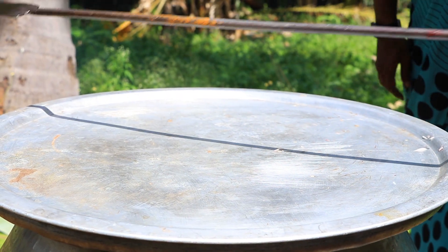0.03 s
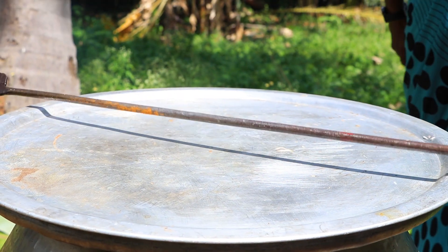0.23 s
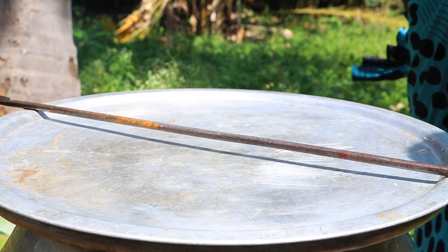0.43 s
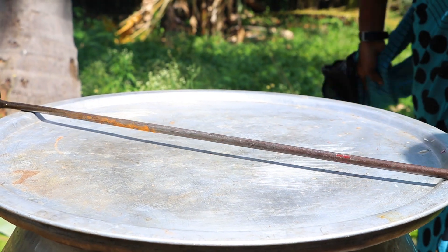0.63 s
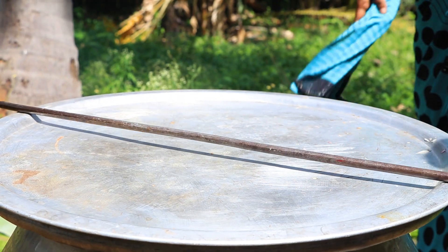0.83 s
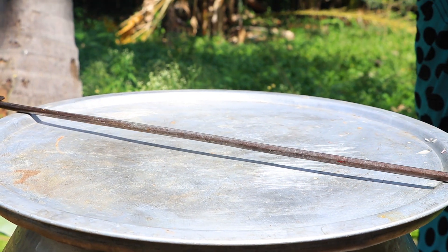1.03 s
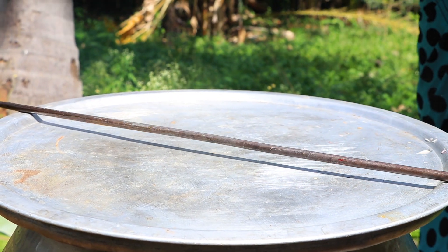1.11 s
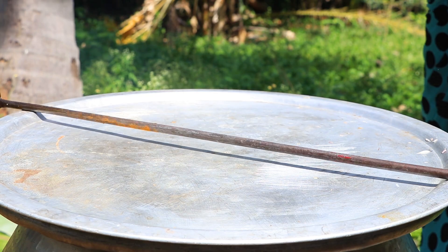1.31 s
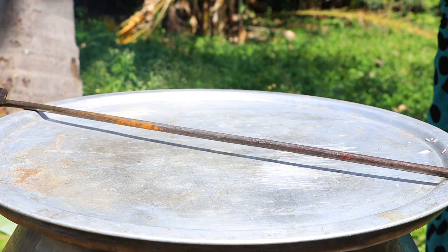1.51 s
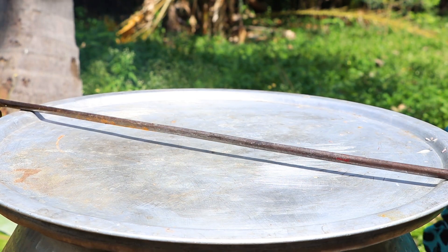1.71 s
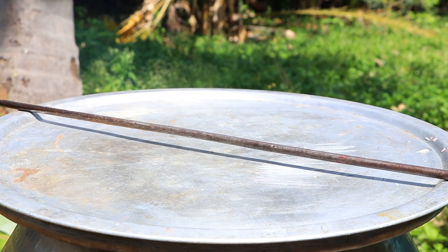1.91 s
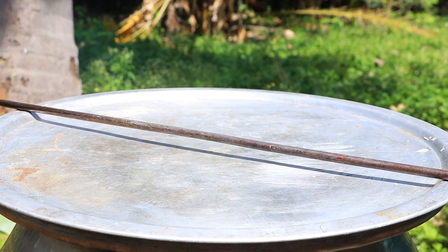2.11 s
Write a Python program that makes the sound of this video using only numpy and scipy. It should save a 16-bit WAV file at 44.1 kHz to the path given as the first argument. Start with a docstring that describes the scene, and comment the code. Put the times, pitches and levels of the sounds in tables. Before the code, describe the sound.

Loud metallic clang of a rod dropped on a large pot lid, rattling and ringing away outdoors.

```python
"""Outdoors in a quiet garden, a long steel rod is dropped across the big metal lid of a cooking pot, close by.
Impulses for the blows and chatter drive noise-built sheet metal, wavering lid modes, a contact crack,
the rod's own ring and the air in the pot. The lid then settles and rings out as clean decaying tones.
Tiny high ticks of the rocking rod, soft noise scuffs and a faint falling whistle sit over garden air
and a low drone. A weak echo follows the crash, and a fast limiter holds it."""
import sys
import numpy as np
from scipy import signal
from scipy.fft import rfft, irfft, next_fast_len
from scipy.io import wavfile
from scipy.ndimage import uniform_filter1d, minimum_filter1d, map_coordinates

SR = 44100
rng = np.random.default_rng(int(sys.argv[2]) if len(sys.argv) > 2 else 0)


def pcm_store(signal):
    """Save signal as 16-bit PCM."""
    levels = np.round(np.clip(np.atleast_2d(signal), -1, 1) * 32767)
    wavfile.write(sys.argv[1], SR, levels.astype(np.int16).T)


N = 94815  # length in samples
TOP_HZ = 15600  # upper edge of the whole sound


def amp(db):
    """Decibels to gain."""
    return 10 ** (np.asarray(db) / 20)


def unit(x):
    """Scale to rms 1."""
    return x / np.sqrt(np.mean(x ** 2) + 1e-20)


def along(points, hz):
    """Read a curve of (f/Hz, value) points on a log frequency axis."""
    f, v = np.transpose(points)
    return np.interp(np.log(hz + 1), np.log(f + 1), v)


def over_time(points, t):
    """Read a curve of (t/s, value) points."""
    return np.interp(t, *np.transpose(points))


def since(s):
    """Seconds since a moment, zero before it."""
    return np.maximum(np.arange(N) / SR - s, 0)


def fade(t, t60):
    """Exponential decay that falls 60 dB in t60 seconds."""
    return np.exp(-np.log(1000) * t / t60)


def sine(hz):
    """A sine that follows a moving pitch."""
    return np.sin(2 * np.pi * np.cumsum(hz) / SR)


def wobble(rate):
    """A smooth random curve, rate knots a second."""
    return map_coordinates(rng.standard_normal(1024), [since(0) * rate], mode="wrap")


def filtered(x, response):
    """Shape the spectrum of x by a response of frequency."""
    m = next_fast_len(N + SR // 2)
    return irfft(rfft(x, m) * response(np.fft.rfftfreq(m, 1 / SR)), m)[..., :N]


def pan(db):
    """Channel gains for a left-minus-right level."""
    return amp(np.array([[.5], [-.5]]) * db)


# Likeness of the two microphones: f/Hz, correlation
ALIKE = [(60, .92), (290, .95), (640, .85), (1400, .75), (3100, .45), (6800, .1), (15000, 0)]


def half_turn(alike, hz):
    """Half the phase angle between channels whose cosine is their likeness."""
    return np.arccos(np.clip(along(alike, hz), -1, 1)) / 2


def noise(colour_db, alike=ALIKE):
    """Stereo noise of rms 1 with a colour and a left-right likeness."""
    def mid_side(hz):
        turn = half_turn(alike, hz)
        return amp(colour_db(hz)) * [np.cos(turn), np.sin(turn)]

    mid, side = filtered(rng.standard_normal((2, N)), mid_side)
    return unit(np.array([mid + side, mid - side]))


def tone(hz, t, drift=0):
    """One mode at the two microphones; high modes arrive out of step. Drift is in cycles."""
    apart = half_turn(ALIKE, hz) * rng.choice([-1, 1])
    start = rng.uniform(0, 2 * np.pi)
    return np.sin(2 * np.pi * (hz * t + drift) + start + np.array([[apart], [-apart]]))


def dying(x, t60s):
    """Let each frequency of x die at its own speed."""
    hz, t, z = signal.stft(x, SR, nperseg=512)
    z = z * fade(t, along(t60s, hz)[:, None])
    return signal.istft(z, SR, nperseg=512)[1][:, :N]


def pulses(times, sizes):
    """A train of impulses."""
    places = np.clip(np.round(times * SR).astype(int), 0, N - 1)
    return np.bincount(places, sizes, N)


def excite(force, response):
    """A body's answer to a force, by convolution."""
    return signal.fftconvolve(np.atleast_2d(force), response, axes=1)[:, :N]


def stored(force, t60):
    """The amplitude of a resonator that gathers the energy of each contact."""
    energy = signal.lfilter([1], [1, -fade(1 / SR, t60) ** 2], force ** 2)
    return np.sqrt(energy)


# Colour of the outdoor air: f/Hz, relative level/dB
GARDEN_COLOUR = [(25, -16.5), (60, -6), (90, -2.5), (120, -13.5), (160, -12), (350, -9), (600, -16.5),
                 (1800, -19.5), (4800, -28), (8800, -28), (15000, -37.5)]
# Left-right likeness of the air: f/Hz, correlation
GARDEN_ALIKE = [(60, 1), (240, 0.84), (950, 0.92), (3800, 0.44)]
GARDEN_DB, GARDEN_WAVER_DB = -65.5, .7


def garden(pan_db=-2):
    """Quiet outdoor air: coloured noise whose level wavers slightly."""
    level = amp(GARDEN_DB + GARDEN_WAVER_DB * wobble(30))
    return level * noise(lambda hz: along(GARDEN_COLOUR, hz), GARDEN_ALIKE) * pan(pan_db)


# Swells of the low drone far away: t/s, level/dB
DRONE_SWELLS = [(0, -71), (1.151, -74.5), (1.3, -66), (1.45, -58.5), (1.65, -85), (1.85, -65.5),
                (2.15, -74)]
DRONE_HZ, DRONE_WIDTH_HZ = 91, 6  # centre, and distance from it where the level is down 6 dB


def drone():
    """A low distant drone: a narrow band of noise that swells and sinks."""
    band = noise(lambda hz: -20 * np.log10(1 + ((hz - DRONE_HZ) / DRONE_WIDTH_HZ) ** 2))
    return band * amp(over_time(DRONE_SWELLS, since(0)))


WHISTLE_S, WHISTLE_LENGTH_S, WHISTLE_DB = .137, .042, -68  # start, length, peak level
WHISTLE_FROM_HZ, WHISTLE_TO_HZ = 2450, 1450


def whistle():
    """A short, faint tone before the blow that glides down."""
    u = np.clip(since(WHISTLE_S) / WHISTLE_LENGTH_S, 0, 1)
    hz = WHISTLE_FROM_HZ * (WHISTLE_TO_HZ / WHISTLE_FROM_HZ) ** u
    return amp(WHISTLE_DB) * np.sin(np.pi * u) * sine(hz)


# Soft scuffs and low bumps: t/s, level/dB, centre f/Hz, length/s (peak at half of it)
SCUFFS = [(0.63, -58, 75, 0.17), (1.21, -60, 1400, .011), (1.28, -64, 3500, .01),
          (1.362, -59.5, 1200, .0092), (1.805, -66, 92, .04), (1.82, -64, 2500, .005)]


def scuffs(skirt_db=11, pan_db=-4):
    """Soft puffs of noise that swell and fade, falling skirt_db per octave off their centre."""
    out = np.zeros((2, N))
    for s, db, centre_hz, length in SCUFFS:
        u = 2 * since(s) / length
        puff = noise(lambda hz: -skirt_db * np.abs(np.log2((hz + 1) / centre_hz)))
        out += amp(db) * u * np.exp(1 - u) * puff
    return out * pan(pan_db)


# Ticks of the rod: t/s, relative level/dB
TICKS = [(.043, -63), (0.748, -64), (0.8012, -54), (0.8328, -54), (0.8346, -49), (0.848, -74),
         (0.862, -47.5), (0.872, -49.5), (0.922, -50.5), (0.932, -55.5), (0.956, -58), (.968, -56),
         (1.0245, -50.5), (1.106, -62), (1.1214, -56)]
# Modes of one tick: f/Hz before detuning, relative level/dB, t60/s
TICK_MODES = [(8990, -0.5, 0.054), (9550, -1.5, 0.057), (9500, -4.5, 0.15), (10200, -4, 0.028),
              (14100, -4, 0.05), (14400, 5, 0.045), (15300, -1.5, .06), (15550, 1, .05)]
TICK_DB, TICK_PAN_DB, TICK_RISE_S = -3.5, -11, 0.00086
TICK_GRIT_DB, TICK_GRIT_T60 = -5, 0.038  # noise within each tick
TICK_DETUNE, TICK_SCATTER_DB = 0.014, 3  # spread per mode: fraction of pitch, level
TICK_WAVER_HZ, TICK_ROUGH_DB = 110, 3.5  # rms waver of pitch and level within a tick


def tick_mode(hz, level, t60, t):
    """One squeaky mode of a tick, its pitch and level jittering as it dies."""
    waver = TICK_WAVER_HZ * unit(uniform_filter1d(rng.standard_normal(len(t)), size=120))
    rough_db = TICK_ROUGH_DB * unit(uniform_filter1d(rng.standard_normal(len(t)), size=200))
    gain = amp(level + TICK_SCATTER_DB * rng.normal() + rough_db)
    pitch = hz * (1 + TICK_DETUNE * rng.normal())
    return gain * tone(pitch, t, np.cumsum(waver) / SR) * fade(t, t60)


def ticks():
    """The rod slips on the rim in tiny, high, squeaky ticks."""
    out = np.zeros((2, N + SR))
    t = np.arange(SR // 6) / SR
    rise = 1 - np.exp(-t / TICK_RISE_S)
    for s, db in TICKS:
        ring = sum(tick_mode(hz, level, t60, t) for hz, level, t60 in TICK_MODES)
        grit = amp(TICK_GRIT_DB) * rng.standard_normal(ring.shape) * fade(t, TICK_GRIT_T60)
        start = round(s * SR)
        out[:, start:start + len(t)] += amp(db + TICK_DB) * (ring + grit) * rise
    return out[:, :N] * pan(TICK_PAN_DB)


# Faint ring left in the metal by an earlier touch: f/Hz, relative level/dB
LINGER_MODES = [(285.3, -71), (382.2, -70.5), (904.4, -70.5), (1055, -72), (1233, -72), (1292, -71.5),
                (1421, -70.5), (1615, -76.5)]
LINGER_DB, LINGER_T60 = 3, 7.5


def lingering_ring():
    """The lid still rings faintly before the blow, as slowly dying tones cut off by it."""
    t = since(0)
    ring = sum(amp(db + LINGER_DB) * tone(hz, t) for hz, db in LINGER_MODES)
    return ring * fade(t, LINGER_T60) * (t < BLOWS[0][0])


SEATED_S, SEATING_S = .65, .25  # moment the lid is seated, and how long it takes to settle


def seating():
    """How far the lid has settled on the pot, 0-1."""
    return np.clip(since(SEATED_S - SEATING_S) / SEATING_S, 0, 1)


# Weak, close modes of the seated lid: f/Hz, relative level of each/dB
SHIMMER = [(230, -57.5), (330, -60.5), (500, -64.5), (1000, -61), (1450, -48.5), (1900, -54), (2200, -59),
           (3000, -60), (3600, -65)]
SHIMMER_T60, SHIMMER_SLOPE = 0.87, 0.079  # t60 at 1 kHz (s), exponent of its fall with frequency


def shimmer(count=110):
    """Many weak modes, scattered evenly in pitch, beat against the strong ones."""
    t, age = since(0), since(SEATED_S)
    low, high = SHIMMER[0][0], SHIMMER[-1][0]
    out = np.zeros((2, N))
    for hz in low + (high - low) * (np.arange(count) + rng.random(count)) / count:
        t60 = SHIMMER_T60 * (1000 / hz) ** SHIMMER_SLOPE
        out += amp(along(SHIMMER, hz)) * tone(hz, t) * fade(age, t60)
    return out


# Modes of the lid once it is seated on the pot again: f/Hz, relative level/dB, t60/s
SEATED_MODES = [(280, -48, .95), (334, -41, .62), (381, -39, .8), (480, -54, .8), (586, -43.5, 1.36),
                (743, -49.5, 1.1), (909, -43, 1.56), (953, -48, 1), (1098, -45, .93), (1178, -38, .66),
                (1292, -45, .67), (1402, -42, .85), (1417, -42.5, 1.29), (1461, -50, 1), (1504, -35, 1.12),
                (1635, -47, .7), (1727, -51.5, 2), (1826, -53, 2.6), (1851, -53, 1.3), (1965, -44, .75),
                (2208, -50, 1.46), (2438, -53, .77), (2525, -49, .86), (2736, -44, .57), (3047, -44, .82),
                (3322, -55, .75), (3505, -49, .42)]


def ring_out():
    """The seated lid rings long and clean: tones fade in as it settles, then die one by one."""
    t, age = since(0), since(SEATED_S)
    strong = sum(amp(db) * tone(hz, t) * fade(age, t60) for hz, db, t60 in SEATED_MODES)
    return seating() * (strong + shimmer())


BOOM_START_HZ, BOOM_END_HZ, BOOM_SAG_S = 100.2, 81, 0.1
BOOM_T60, BOOM_RISE_S = 0.18, 0.0069


def boom(kicks):
    """The air in the pot swells with each blow; its pitch sags as the lid closes."""
    lag = np.exp(-1 / (BOOM_RISE_S * SR))
    swell = signal.lfilter([1 - lag], [1, -lag], stored(kicks, BOOM_T60))
    sag = np.exp(-(since(BLOWS[0][0]) / BOOM_SAG_S) ** 2)
    return swell * sine(BOOM_END_HZ + (BOOM_START_HZ - BOOM_END_HZ) * sag)


THUD_DB, THUD_S = 7.5, 0.0015  # gain on the boom's kicks, time constant


def thud(kicks):
    """Each blow shoves the whole lid: one low push of air."""
    u = np.arange(SR // 20) / SR / THUD_S
    return amp(THUD_DB) * excite(kicks, [(1 - u) * np.exp(-u)])


# The rod's own bright ring: f/Hz, relative level/dB
ROD_MODES = [(4883, -2), (5212, -1), (5680, -7), (6094, -11), (6385, 2), (6735, 0), (7070, -8)]
ROD_DB, ROD_T60 = -15.5, 0.077


def rod_ring(contacts):
    """Each contact rings the steel rod in a cluster of high modes."""
    modes = sum(amp(db) * tone(hz, since(0)) for hz, db in ROD_MODES)
    return amp(ROD_DB) * stored(contacts, ROD_T60) * modes


# Colour of the contact crack: f/Hz, relative level/dB
CRACK_COLOUR = [(500, -21), (3000, -4.5), (5000, -6), (6800, 7.5), (8500, -9.5), (15000, -18)]
CRACK_T60 = .034


def crack(contacts):
    """Metal strikes metal: a short burst of bright noise at each contact."""
    return noise(lambda hz: along(CRACK_COLOUR, hz)) * stored(contacts, CRACK_T60)


# Colour of the sheet's countless weaker modes: f/Hz, relative level/dB
SHEET_COLOUR = [(35, -30), (70, -3.5), (160, -10.5), (195, -10.5), (300, -5), (500, -0.5), (850, -6.5),
                (1300, 3), (2600, 0.5), (4000, -1.5), (4800, -7.5), (5800, -4), (6900, -3), (8000, -15.5),
                (11000, -20), (15000, -33)]
# Their decay: f/Hz, t60/s
SHEET_T60 = [(100, 0.12), (500, 0.25), (1500, 0.27), (3000, 0.36), (5000, 0.27), (8000, .19),
             (15000, 0.057)]
SHEET_DB, SHEET_SPACING_HZ, SHEET_DIFFUSE_DB = -12.5, 20, -22  # level, mode spacing, bed between modes


def sheet_lines(hz):
    """Gain in dB of closely spaced, irregular modes over a weak diffuse bed."""
    count = int(TOP_HZ / SHEET_SPACING_HZ)
    modes_hz = (np.arange(count) + rng.random(count)) * SHEET_SPACING_HZ
    db = np.full(len(hz), float(SHEET_DIFFUSE_DB))
    db[np.searchsorted(hz, modes_hz)] = 0
    return db


def sheet_ring(force):
    """The lid's sheet metal answers each impulse with noise-like modes that die by frequency."""
    modes = noise(lambda hz: along(SHEET_COLOUR, hz) + sheet_lines(hz))
    return excite(force, amp(SHEET_DB) * dying(modes, SHEET_T60))


# Main modes of the jolted lid: f/Hz before wander and sag, relative level/dB
LOOSE_MODES = [(157, -39.5), (248, -28), (291, -35.5), (350, -32), (484, -34.5), (612, -35), (756, -29.5),
               (952, -32), (1093, -36), (1173, -29.5), (1292, -32), (1419, -29), (1635, -31), (1857, -39),
               (1890, -32.5), (2014, -33), (2137, -37), (2466, -36.5), (2546, -34), (2738, -36.5),
               (3016, -34.5), (3618, -32), (3962, -35.5), (4011, -37)]
LOOSE_DB, LOOSE_T60, LOOSE_SLOPE = 6.5, 0.3, .05  # gain, t60 at 1 kHz (s), exponent of its fall
WANDER_HZ, FLUTTER_DB = 6, 4  # the shifting rod detunes and chokes the modes
CHATTER_KNEE_HZ = 608.4  # light contacts miss the modes below it
SAG_HZ, SAG_BELOW_HZ = 16, 800


def loose_ring(blows, chatter, rate=30):
    """Main modes swell with the contacts and waver as the rod shifts; low ones sag as the lid settles."""
    t, out = since(0), np.zeros((2, N))
    for hz, db in LOOSE_MODES:
        force = blows + chatter * hz / np.hypot(hz, CHATTER_KNEE_HZ)
        swing = stored(force, LOOSE_T60 * (1000 / hz) ** LOOSE_SLOPE)
        detune_hz = WANDER_HZ * wobble(rate) - SAG_HZ * seating() * (hz < SAG_BELOW_HZ)
        gain = amp(db + LOOSE_DB + FLUTTER_DB * wobble(rate))
        out += gain * swing * tone(hz, t, np.cumsum(detune_hz) / SR)
    return out


# Chatter of rod and lid between the blows: t/s, relative level/dB
CHATTER = [(.233, -12.5), (.26, -11.5), (.31, -16), (.365, -9), (.41, 3), (.46, -3), (.50, -6),
           (.55, -12.5), (.59, -21), (.62, -35), (.68, -55.5)]
CHATTER_DB, CHATTER_PER_S, CHATTER_SCATTER_DB = -6.5, 170, 3.5  # gain, mean rate, spread of level


def chatter_force():
    """Rod and lid rattle together: irregular light impulses under a level curve."""
    chance = rng.standard_normal((400, 2))
    steps = np.abs(np.arange(len(chance)) + chance[:, 0] / 2)
    times = CHATTER[0][0] + steps / CHATTER_PER_S
    sizes = unit(amp(CHATTER_SCATTER_DB * chance[:, 1])) * rng.choice([-1, 1], len(times))
    sizes = sizes * amp(CHATTER_DB + over_time(CHATTER, times))
    return pulses(times, sizes * (times < CHATTER[-1][0]))


# Blows of the rod: t/s, strength level/dB, crack level/dB, boom level/dB (all relative)
BLOWS = [(0.2302, 4.5, -1.5, -18), (0.2318, -6.5, -4.5, -30), (0.2416, -8, -20, -23.5),
         (0.2668, -1.5, -27.5, -20.5), (0.2887, -6.5, -37.5, -26), (0.3202, -1.5, -18.5, -43),
         (0.3364, -4.5, -12.5, -31.5), (0.3622, 1, -7, -27.5), (0.397, -9, -28.5, -26),
         (0.4332, -9.5, -25.5, -40.5), (0.4484, -7, -16.5, -48), (0.503, -14, -29, -26)]
CHATTER_CRACK_DB = -15  # share of the chatter that cracks and rings the rod
BLOOM_S = .005  # the main modes take a moment to build


def crash():
    """Blows and chatter drive the lid, crack at the contact and ring the rod; blows also boom the pot."""
    s, strength_db, crack_db, boom_db = np.transpose(BLOWS)
    blows, chatter = pulses(s, amp(strength_db)), chatter_force()
    contacts = pulses(s, amp(crack_db)) + amp(CHATTER_CRACK_DB) * chatter
    kicks = pulses(s, amp(boom_db))
    bloom = 1 - np.exp(-since(s[0]) / BLOOM_S)
    lid = sheet_ring(blows + chatter) + bloom * loose_ring(blows, chatter)
    return lid + crack(contacts) + rod_ring(contacts) + boom(kicks) + thud(kicks)


# Decay of the echo off trees: f/Hz, t60/s
YARD_T60 = [(200, 0.76), (2000, 0.69), (6000, 0.73), (14000, 0.2)]
YARD_DB = -25.5


def yard_echo(hit):
    """Trees scatter the crash back as a weak tail of dying noise."""
    tail = dying(rng.standard_normal((2, N)), YARD_T60)
    return amp(YARD_DB) * excite(hit, tail / np.linalg.norm(tail[0]))


# Stereo place of the lid: f/Hz, left-minus-right level/dB
LEFT_LEAD = [(60, -3), (450, -1.03), (740, -3.5), (1220, -0.5), (2000, -5), (3300, -7), (5500, 0),
             (9000, -5), (15000, -5.5)]


def scene():
    """The lid, with its echo, lies a little to the right among the quieter sounds."""
    hit = crash()
    lid = hit + yard_echo(hit) + ring_out() + lingering_ring()
    lid = filtered(lid, lambda hz: pan(along(LEFT_LEAD, hz)))
    return garden() + drone() + whistle() + scuffs() + ticks() + lid


CEILING, HOLD_S = .98, .0012  # limiter: peak (full scale is 1), window of the gain


def record(dry, low_cut_hz=42):
    """A low cut; a fast limiter holds the crash under full scale; then the band limit."""
    dry = signal.sosfilt(signal.butter(3, low_cut_hz, "high", fs=SR, output="sos"), dry)
    needed = np.minimum(1, CEILING / (np.abs(dry).max(axis=0) + 1e-9))
    span = max(int(HOLD_S * SR), 2)
    gain = uniform_filter1d(minimum_filter1d(needed, span), span)
    return filtered(dry * gain, lambda hz: np.clip((TOP_HZ - hz) / 400 + .5, 0, 1))


dry = scene()
out = record(dry)
pcm_store(out)
```